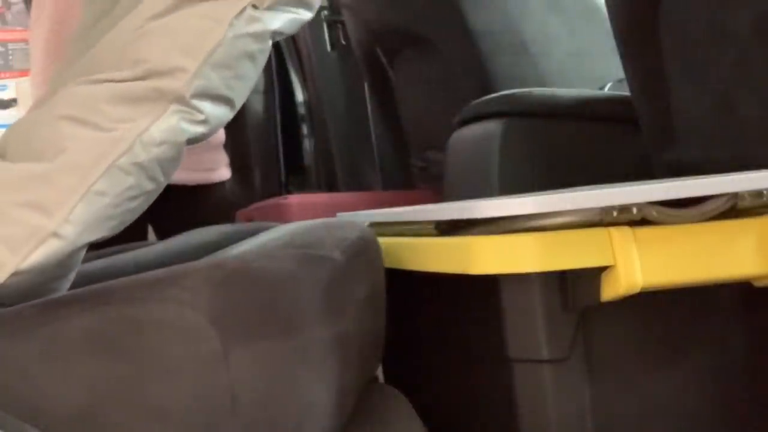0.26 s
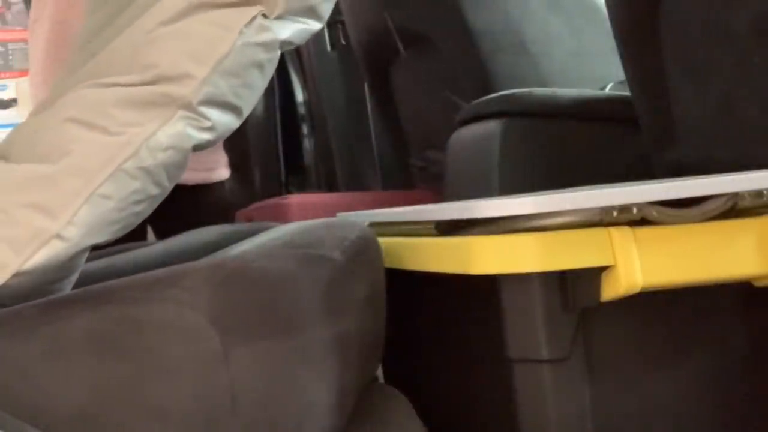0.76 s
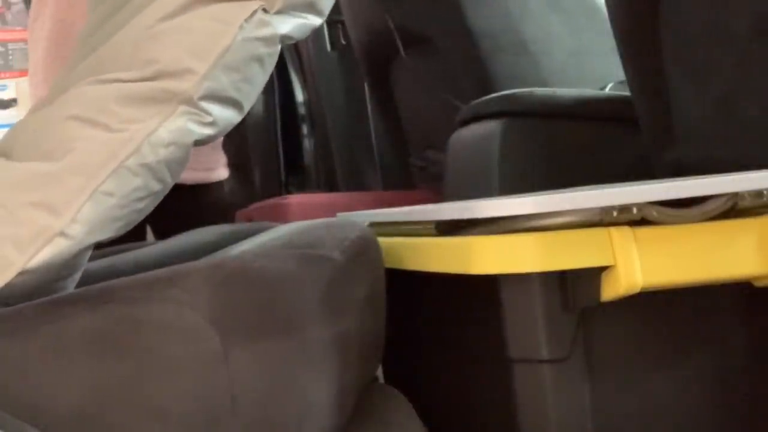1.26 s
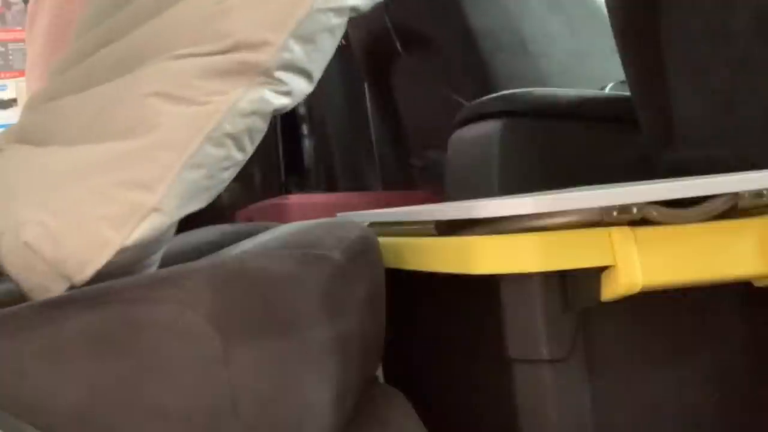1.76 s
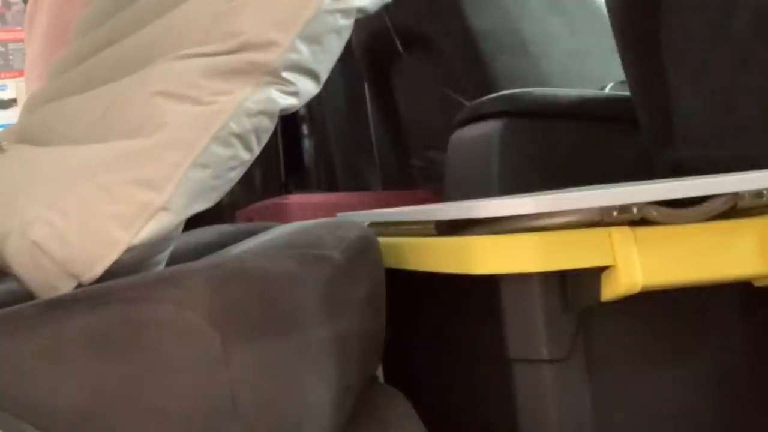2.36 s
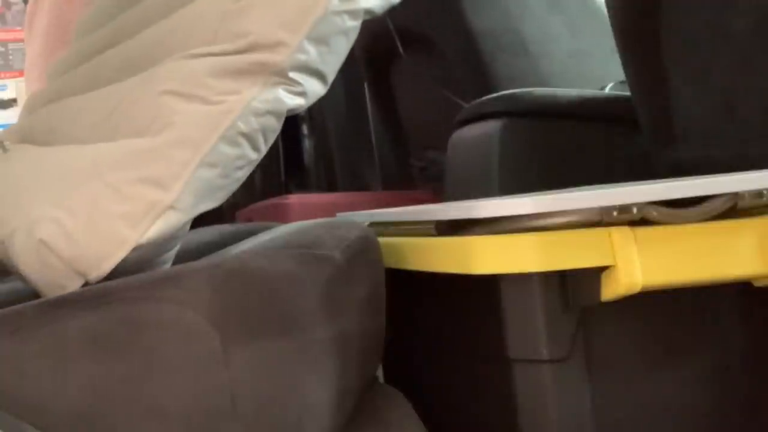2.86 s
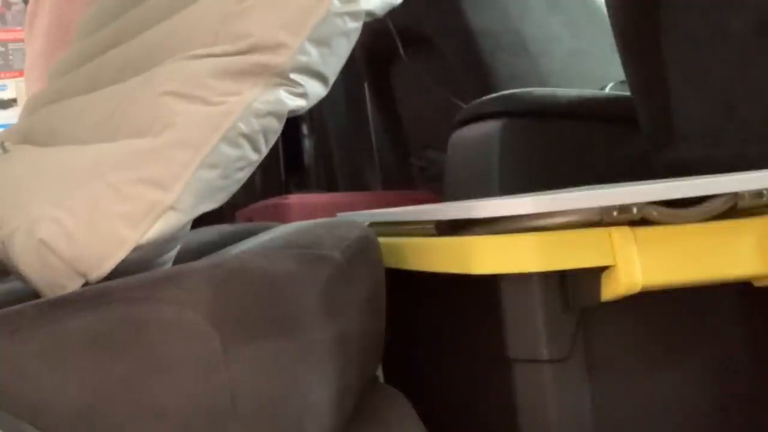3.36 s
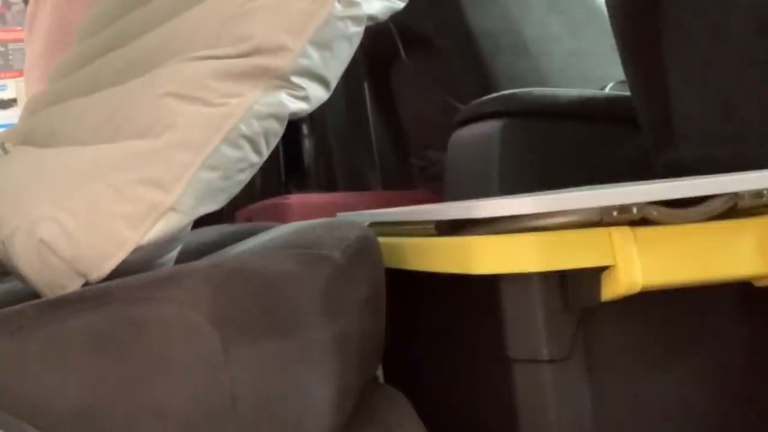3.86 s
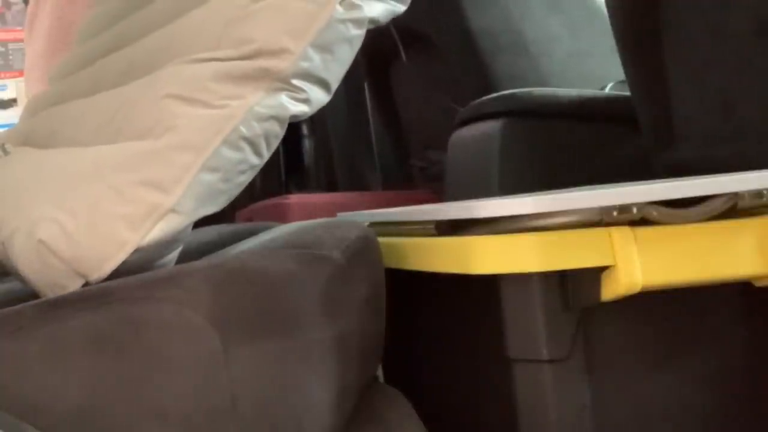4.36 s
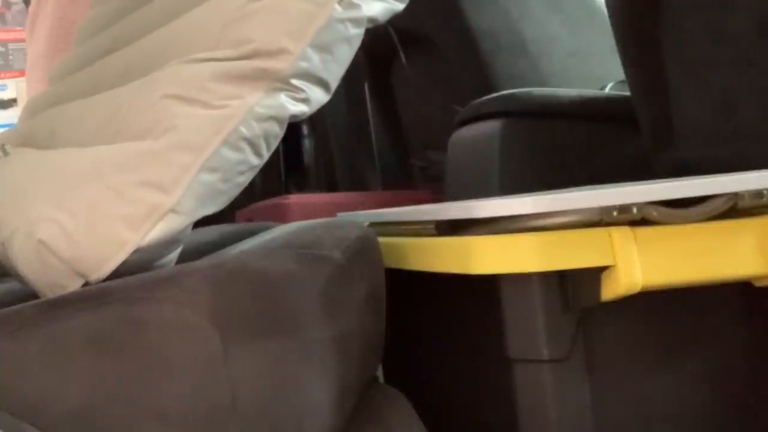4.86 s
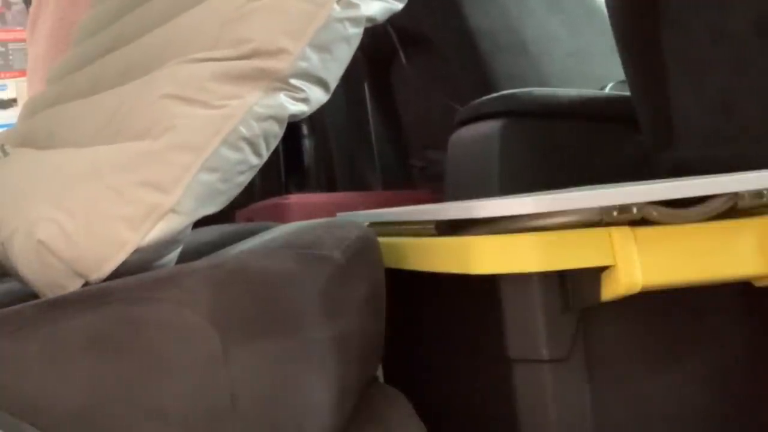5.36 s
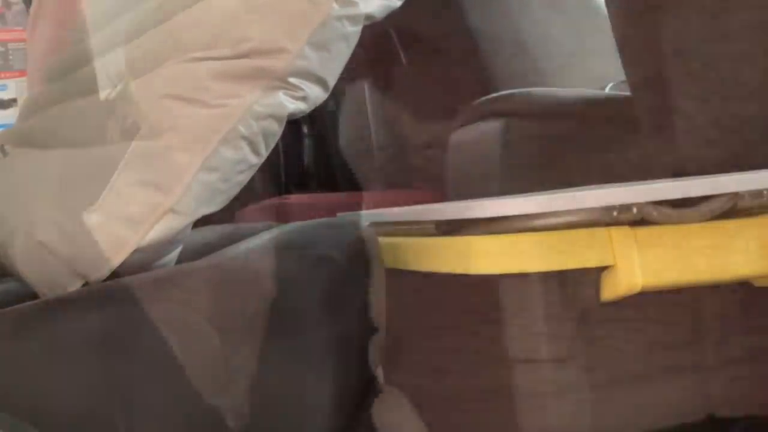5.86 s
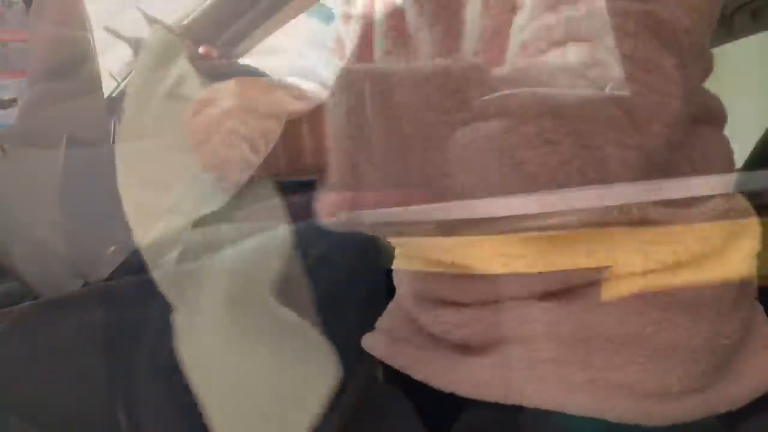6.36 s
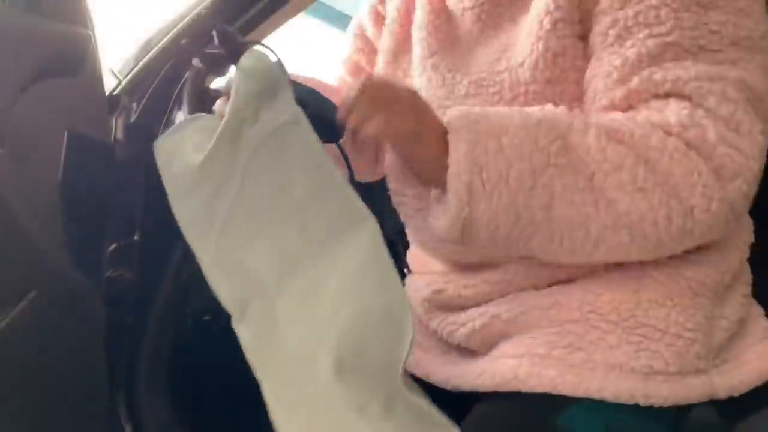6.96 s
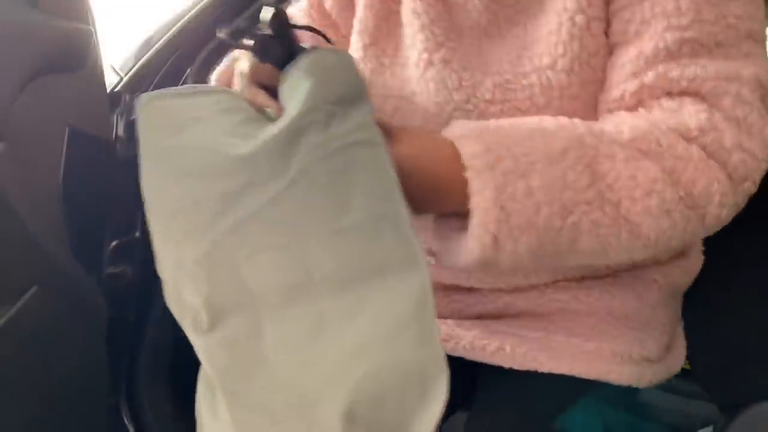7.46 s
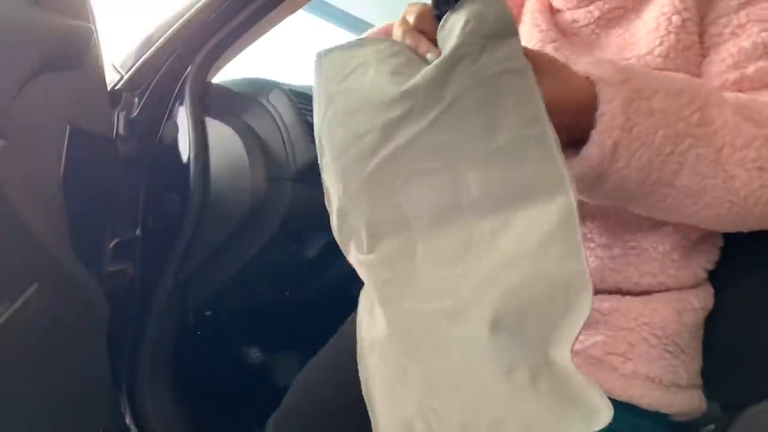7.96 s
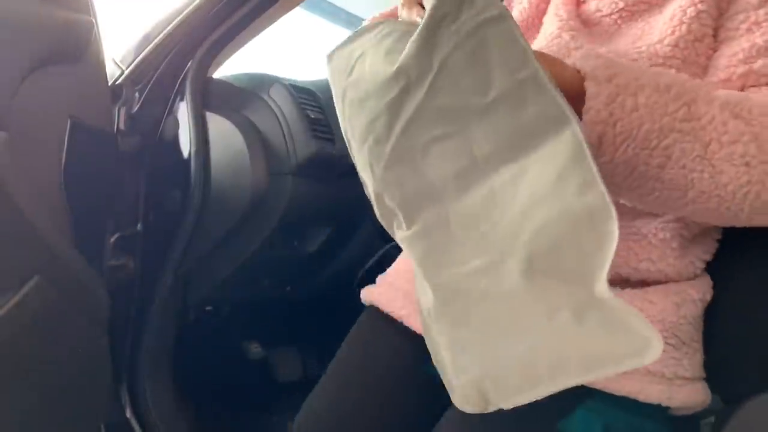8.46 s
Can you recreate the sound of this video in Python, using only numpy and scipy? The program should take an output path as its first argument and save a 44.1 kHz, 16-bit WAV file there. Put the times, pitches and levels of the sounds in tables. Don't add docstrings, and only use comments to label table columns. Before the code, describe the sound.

A close stereo pickup in a cramped car cabin hears a steady electric inflator, buzzing mid-pitched whine and broad air rush, with the engine humming deep below. Faint cloth strokes begin underneath around six seconds. The pump is then cut hard, and a fabric bag rustles, drags and bumps gently against a soft bed of vent air, faint fan whine and slow idling.

```python
import sys
import numpy as np
from scipy import signal
from scipy.fft import rfft, irfft
from scipy.io import wavfile

SR = 44100
rng = np.random.default_rng(int(sys.argv[2]) if len(sys.argv) > 2 else 0)


def to_wav(sig):
    pcm = np.clip(np.atleast_2d(sig), -1, 1) * 32767
    pcm = np.round(pcm).astype(np.int16)
    wavfile.write(sys.argv[1], SR, pcm.T)


def field_ratio(decibels):
    return 10 ** (np.asarray(decibels, dtype=float) / 20)


N = 383669
TIME = np.arange(N) / SR
FREQ = np.maximum(np.arange(N // 2 + 1) * SR / N, 1)
SIDES = np.array([[.5], [-.5]])


def rms_one(x):
    return x / np.sqrt(np.mean(x ** 2) + 1e-20)


def in_time(rows):
    s, *columns = np.transpose(rows)
    return [np.interp(TIME, s, c) for c in columns]


def in_hz(rows):
    hz, *columns = np.transpose(rows)
    return [np.interp(np.log(FREQ), np.log(hz), c) for c in columns]


def drift(rate_hz):
    spectrum = rfft(rng.standard_normal(N // 32 + 2))
    hz = np.linspace(0, SR / 64, len(spectrum))
    slow = irfft(spectrum / (1 + (hz / rate_hz) ** 2))
    return np.interp(np.arange(N) / 32, np.arange(len(slow)), rms_one(slow - slow.mean()))


def bell(hz, width_hz):
    return 1 / (1 + (2 * (FREQ - hz) / width_hz) ** 2)


def bumps_db(peaks):
    return sum(db * bell(hz, width_hz) for hz, width_hz, db in peaks)


def at_ports(colour_db, ports):
    alike, lead_rad, pan_db = in_hz(ports)
    alike = np.clip(alike, 0, 1)
    shared, *own = rfft(rng.standard_normal((3, N)))
    direct = np.sqrt(alike) * shared * np.exp(1j * SIDES * lead_rad)
    diffuse = np.sqrt(1 - alike) * np.array(own)
    return (direct + diffuse) * field_ratio(colour_db + SIDES * pan_db)


def orders(rate_hz, table, wobble_db, wobble_hz):
    turns, out = 2 * np.pi * np.cumsum(rate_hz) / SR, 0
    for k, level_db, pan_db, lead_rad in table:
        unrest = np.sqrt(min(k, 9))
        level_db = level_db + wobble_db * unrest * drift(wobble_hz * unrest)
        phase = k * turns + rng.uniform(0, 2 * np.pi) + SIDES * lead_rad
        out = out + np.sqrt(2) * field_ratio(level_db + SIDES * pan_db) * np.sin(phase)
    return out


# delay_s, level_db
ECHOES = [(.0011, -15), (.0027, -15), (.0046, -17), (.0083, -18)]


def cabin():
    echoes = sum(field_ratio(db) * np.exp(-2j * np.pi * FREQ * s) for s, db in ECHOES)
    return 1 + echoes / (1 + (900 / FREQ) ** 4)


# time_s, slack_0to1, screen_0to1
MATTRESS = [(0, 1, 1), (.36, 0.53, 1), (.48, 0.5, 0.2), (.68, 0.27, 0.06), (.8, 0.39, 0.56),
            (1.0, 0.4, 0.4), (1.4, 0.12, 0.24), (1.8, 0.06, 0.07), (2.7, 0.03, 0.1), (3.4, 0.01, 0.34),
            (4.3, 0.03, 0.28), (5.0, 0, 0.33), (5.6, 0, 0.83), (6.2, 0.04, 0), (6.6, 0.1, 0), (7, 0.09, 0)]


def pump():
    shaft_hz = 363.5 * (1 + .0006 * drift(4) + .0011 * drift(50))
    slack, screen = in_time(MATTRESS)
    return motor_whine(shaft_hz, slack, screen) + rushing_air(shaft_hz, slack) + whistles()


# shaft_multiple, level_db, left_right_db, left_lead_rad
MOTOR = [(1, -46.5, -3, -0.3), (3, -49.5, -2.5, 0.67), (4, -62, 1.5, 2), (5, -62.5, 1, -3),
         (6, -51, -2.5, -1.5), (7, -63, 0, -2.5), (8, -67.5, 3, -1.8), (9, -63, -7, -2.1),
         (10, -63.5, 3, -1.7), (11, -62.5, -4, -2.5), (12, -54.5, 2, -2.5), (13, -69.5, -10.5, -1.5),
         (14, -67, -3, 4.5), (15, -80, -4, 0.5), (18, -68, -6.5, 2),
         (21, -74, 0, 2.8), (24, -65, 0, 3.14), (26, -74, 0, 3.14), (29, -74, 0, -2.3), (36, -72, 0, 0)]
# shaft_multiple, slack_db, screened_db, slack_left_lead_rad
COUPLING = [(1, -8.5, -2.5, 1.5), (3, -18, 0, 0.5), (5, 5, 4, 1), (6, -1.5, -9, 0.5), (9, 7, -3.5, 1.8),
            (10, 3, -5, 1.5), (11, 11.5, -5, 1.8), (12, 10.5, -10.5, 1.5)]


def motor_whine(shaft_hz, slack, screen):
    catch_s, catch_span_s, loose_db = 0.75, .12, -6.5
    settle_s, settle_db_per_s = 2.85, -1
    swing = np.clip(slack / 0.48, 0, 1)
    loose = np.clip((catch_s - TIME) / catch_span_s, 0, 1)
    damping_db = settle_db_per_s * np.maximum(TIME - settle_s, 0) + loose_db * loose
    coupling = {k: effect for k, *effect in COUPLING}
    table = []
    for k, level_db, pan_db, lead_rad in MOTOR:
        slack_db, screen_db, slack_lead_rad = coupling.get(k, (0, 0, 0))
        level_db = level_db + slack_db * slack + screen_db * screen + damping_db * (k == 1)
        table.append((k, level_db, pan_db, lead_rad + slack_lead_rad * swing))
    return orders(shaft_hz, table, wobble_db=.33, wobble_hz=22)


# freq_hz, density_db_per_hz
AIR = [(40, -12), (70, 2), (130, -6.5), (250, -4), (700, -1), (1050, -6), (1500, -9), (2100, -9),
       (4000, -13), (6300, -16.5), (8500, -13), (11000, -22), (12800, -19), (16000, -33)]
# freq_hz, width_hz, level_db
CABIN_PEAKS = [(243, 20, -7), (270, 25, 4), (310, 30, 3), (390, 15, -5), (490, 30, 4), (630, 20, -6),
               (668, 25, 6), (710, 25, 3), (752, 18, -7), (790, 45, 4), (870, 60, -5), (960, 90, 3),
               (1022, 25, 5), (1170, 80, -3), (1330, 120, 4), (1680, 150, -3), (2180, 160, 5),
               (2330, 80, -4), (3080, 200, -4), (3280, 120, 3), (4950, 150, 5), (5400, 400, -2)]
# freq_hz, likeness_0to1, left_lead_rad, left_right_db
PORTS_PUMP = [(90, 1, 0, 0), (200, .93, -.4, 1), (390, .7, -1, -3), (500, .3, -.3, -2),
              (780, .65, -1.7, -3), (1000, .25, .5, -1), (1300, .5, .3, 0), (2300, .5, -1.2, -1),
              (4200, .4, -2.1, 0), (6000, .4, -4.3, -1)]
# freq_hz, likeness_0to1, left_lead_rad, left_right_db
PORTS_PUMP_TOP = [(7300, .8, -3.7, 0), (8150, .93, -3.35, 0), (8600, .98, -3.14, 0), (10000, .97, -3.05, 0),
                  (11400, .5, -1.5, 0), (12800, .85, -.35, 0), (13800, .96, 0, 0)]


def rushing_air(shaft_hz, slack):
    body_db, rasp_db, top_db = [db * slack + 0.77 * drift(27) for db in (-2, 3, 2.1)]
    colour_db = in_hz(AIR)[0] + bumps_db(CABIN_PEAKS)
    air = at_ports(colour_db, [*PORTS_PUMP, *PORTS_PUMP_TOP]) * cabin()
    low = 1 / (1 + (FREQ / 2300) ** 6)
    high = 1 / (1 + (7000 / FREQ) ** 8)
    zones = irfft(air * np.array([low, 1 - low - high, high])[:, None], N)
    zones = field_ratio(-43.5) * zones / np.sqrt(np.mean(zones.sum(axis=0) ** 2))
    body, rasp, top = zones
    chop = 1 + .05 * np.sin(2 * np.pi * np.cumsum(shaft_hz) / SR)
    return body * field_ratio(body_db) + chop * (rasp * field_ratio(rasp_db) + top * field_ratio(top_db + 1.2 * drift(7.6)))


# start_s, end_s, pitch_hz, width_hz, level_db
WHISTLES = [
    (0, .3, 935, 60, -50),
    (.3, 1.2, 930, 30, -60),
    (0, 7, 1862, 22, -61),
    (1.5, 7, 2800, 45, -65),
    (0, .55, 3800, 900, -53),
    (.45, 1.5, 5050, 250, -61),
    (1.5, 4.3, 8600, 1200, -59),
    (4.5, 7, 8200, 1200, -61),
    (3.7, 7, 5800, 300, -66),
    (4.0, 7, 10800, 500, -66),
]


def whistles():
    out = 0
    for start_s, end_s, pitch_hz, width_hz, level_db in WHISTLES:
        tone = irfft(at_ports(0, [*PORTS_PUMP, *PORTS_PUMP_TOP]) * bell(pitch_hz, width_hz), N)
        rise = np.clip((TIME - start_s + 0.43) / 0.16, 0, 1)
        fall = np.clip((end_s - TIME + 0.14) / 0.24, 0, 1)
        out = out + rms_one(tone) * rise * fall * field_ratio(level_db)
    return out


# freq_hz, likeness_0to1, left_lead_rad, left_right_db
PORTS_LATER = [(60, 1, 0, 0), (100, 1, -.1, 0), (300, .85, .3, -2), (500, .35, 0, 2), (1000, .2, 0, 2),
               (5000, .1, 0, 0), (6600, .5, 0, -1)]
# freq_hz, likeness_0to1, left_lead_rad, left_right_db
PORTS_LATER_TOP = [(8000, .85, -2.5, 0), (8700, .96, -3.14, 0), (10800, .96, -6.28, 0),
                   (13200, .96, -9.42, 0), (15600, .95, -12.56, 0)]


def handling():
    high_pass = signal.butter(2, 150, "high", fs=SR, output="sos")
    return signal.sosfilt(high_pass, rustle() + drags() + thumps())


# freq_hz, density_db_per_hz
CLOTH = [(150, -28), (300, -5), (700, -1), (2000, -4), (4000, -4.5), (8000, -6.5), (11000, -3.5),
         (16000, -14.5)]
# peak_s, level_db, swell_s_per_20db, fade_s_per_20db
RUSTLE = [(5.97, -62, .09, .15), (6.11, -55.5, 0.092, 0.073), (6.35, -67, .8, 0.76), (6.6, -58, .18, .16),
          (6.78, -59, 0.29, .2), (7.215, -74, .02, .5), (7.278, -74, .3, .13), (7.708, -57.5, 0.032, 0.046),
          (7.78, -68.5, 0.28, 0.063), (8.025, -53.5, 0.08, 0.26), (8.224, -69, .15, 0.028),
          (8.346, -79, 0.082, .055), (8.494, -65.5, 0.013, .056), (8.574, -66, .025, .11),
          (8.7, -77, .045, .05)]


def rustle():
    hiss = rms_one(irfft(at_ports(in_hz(CLOTH)[0], [*PORTS_LATER, *PORTS_LATER_TOP]), N))
    strokes = 0
    for peak_s, level_db, swell_s, fade_s in RUSTLE:
        distance = np.maximum((peak_s - TIME) / swell_s, (TIME - peak_s) / fade_s)
        strokes = strokes + field_ratio(level_db - 20 * distance)
    return hiss * strokes * field_ratio(3.5 + 2.06 * drift(120))


# freq_hz, density_db_per_hz
DRAG = [(120, -40), (250, -3), (400, 5), (800, -4), (2200, -5), (4500, -15), (6000, -46)]
# start_s, end_s, level_db
DRAGS = [
    (7.044, 7.12, -73),
    (7.901, 7.973, -52.5),
    (8.02, 8.124, -54.5),
    (8.12, 8.25, -63),
]


def drags():
    scrape = rms_one(irfft(at_ports(in_hz(DRAG)[0], PORTS_LATER), N)) * field_ratio(4 * drift(200))
    out = 0
    for start_s, end_s, level_db in DRAGS:
        rise = np.clip((TIME - start_s) / 0.009, 0, 1)
        fall = np.clip((end_s - TIME) / (end_s - start_s), 0, 1) ** 0.39
        out = out + scrape * field_ratio(level_db) * rise * fall
    return out


# start_s, peak_db, pitch_hz, t60_s, left_right_db
THUMPS = [
    (7.05, -43.5, 423, 0.21, 8),
    (7.885, -46, 231.5, 0.076, 0),
    (7.908, -45, 377, 0.11, 8),
    (7.98, -40, 302, .06, 0),
    (8.031, -44.5, 430, 0.15, 4),
    (8.576, -56, 490, 0.035, 1),
    (8.649, -51, 270, 0.12, 0),
]


def thumps():
    out = 0
    for start_s, peak_db, pitch_hz, t60_s, pan_db in THUMPS:
        t = np.maximum(TIME - start_s, 0)
        turns = 2 * np.pi * pitch_hz * t
        ring = np.sin(turns + SIDES * 0.95) + 0.29 * np.sin(1.3 * turns)
        onset = (1 - np.exp(-t / 0.0031)) ** 2
        out = out + onset * field_ratio(peak_db + SIDES * pan_db - 60 * t / t60_s) * ring
    return out


# time_s, firing_pattern_hz
IDLE = [(0, 37.16), (.5, 37.54), (.9, 36.92), (1.9, 37), (2.4, 37), (3.1, 37.1), (3.8, 36.83), (4.5, 37),
        (5.5, 37.52), (7, 36.91)]
# multiple, level_db, left_right_db, left_lead_rad
IDLE_ORDERS = [(1, -60, 0, 0), (2, -39, 0, 0), (3, -57, 7, -1.5), (4, -60, -2, 0), (5, -58, 3, -.8),
               (6, -66, -2, -1.3), (7, -66, 0, -.8), (8, -65, 0, -.4), (9, -61, 2, -.7),
               (11, -64, -7, -1.6), (12, -68, 8, -1.0), (13, -63, -6, 2.7)]


def engine_idle():
    return orders(in_time(IDLE)[0], IDLE_ORDERS, wobble_db=0.23, wobble_hz=10.0)


# time_s, firing_pattern_hz
LATER_IDLE = [(5.4, 30.9), (6.1, 30.6), (6.7, 30.46), (7.1, 31.22), (7.35, 31.32), (7.55, 30.84),
              (8.15, 30.81), (8.35, 31.13), (8.7, 30.6)]
# multiple, level_db, left_right_db, left_lead_rad
LATER_ORDERS = [(1, -74, 0, 0), (2, -53, 0, 0), (3, -61, 0, -.4), (4, -54, 0, -.1), (5, -74, 3, .2),
                (6, -67, 5, .7), (7, -65, -7, 0), (9, -70, 0, 0), (11, -76, -5, -.8)]


def later_engine_idle():
    return orders(in_time(LATER_IDLE)[0], LATER_ORDERS, wobble_db=0.18, wobble_hz=3.4)


# freq_hz, density_db_per_hz
VENT = [(40, -8), (90, 6), (160, -5.5), (280, 0), (450, -8), (800, -10.5), (1500, -12), (2200, -15),
        (4000, -22.5), (6000, -30), (8700, -31), (12000, -34), (16000, -35)]
# freq_hz, width_hz, level_db
VENT_PEAKS = [(1020, 34, 12.5), (1950, 120, 2), (430, 35, 0.5)]


def ventilation():
    colour_db = in_hz(VENT)[0] + bumps_db(VENT_PEAKS)
    air = rms_one(irfft(at_ports(colour_db, [*PORTS_LATER, *PORTS_LATER_TOP]) * cabin(), N))
    fan_hz = 1028 + 2.23 * drift(3.04)
    whine = field_ratio(-71.5 + 2.9 * drift(8)) * np.sin(2 * np.pi * np.cumsum(fan_hz) / SR)
    return field_ratio(-56 + 0.4 * drift(2.3)) * air + whine


def scene():
    pump_cut_s, later_start_s = 6.976, 5.43
    first = pump() + engine_idle()
    later = handling() + later_engine_idle() + ventilation()
    first_gain = np.clip((pump_cut_s - TIME) * 2000, 0, 1)
    later_gain = np.clip((TIME - later_start_s) * 100, 0, 1)
    return first * first_gain + later * later_gain


def roll_off(x):
    return signal.sosfilt(signal.butter(12, 15710, fs=SR, output="sos"), x)


def record(dry):
    return roll_off(dry)


dry = scene()
out = record(dry)
to_wav(out)
```